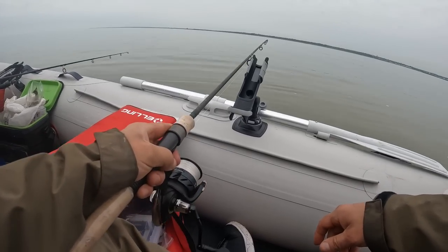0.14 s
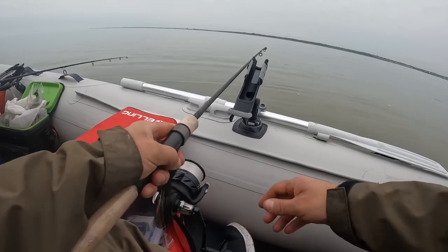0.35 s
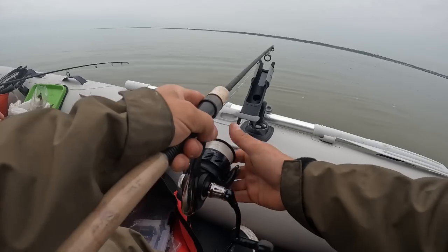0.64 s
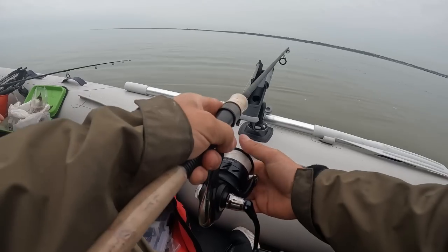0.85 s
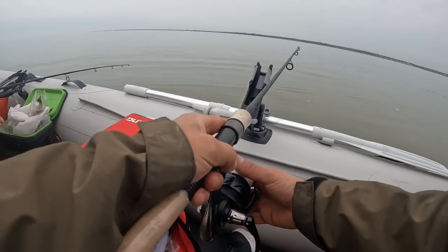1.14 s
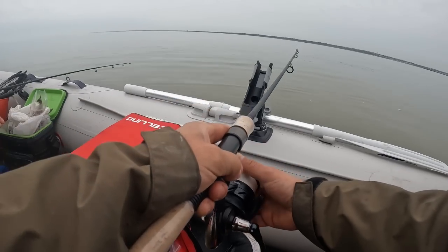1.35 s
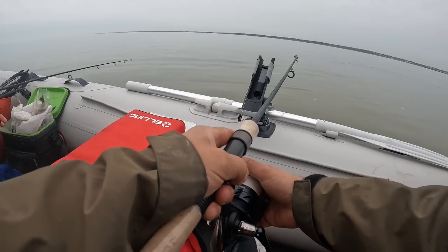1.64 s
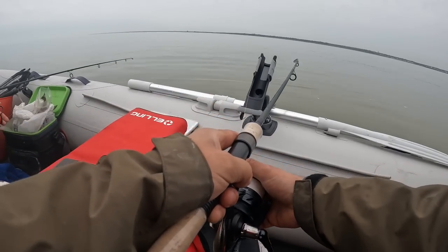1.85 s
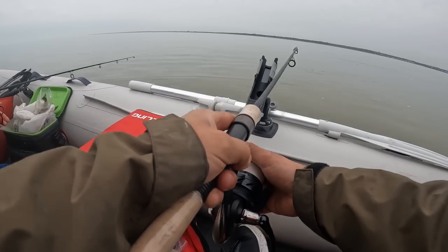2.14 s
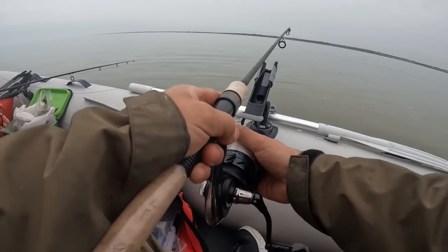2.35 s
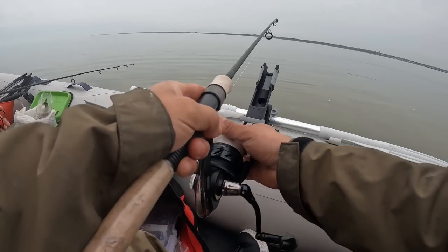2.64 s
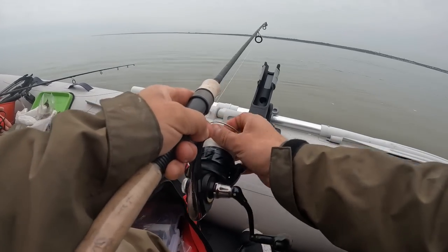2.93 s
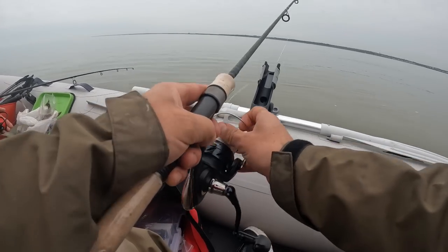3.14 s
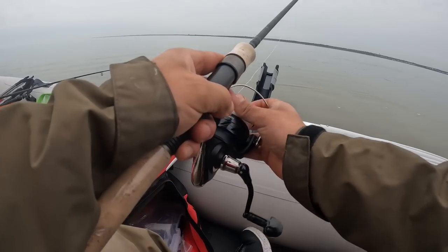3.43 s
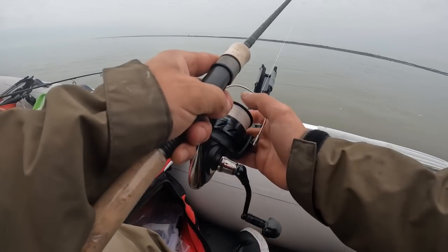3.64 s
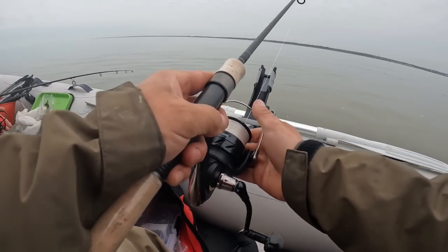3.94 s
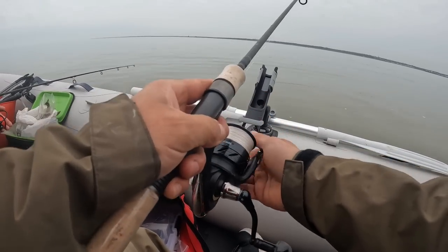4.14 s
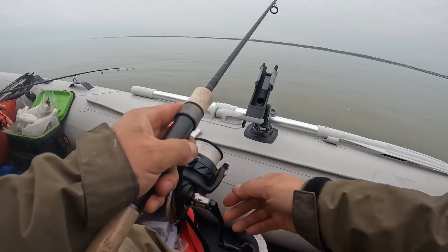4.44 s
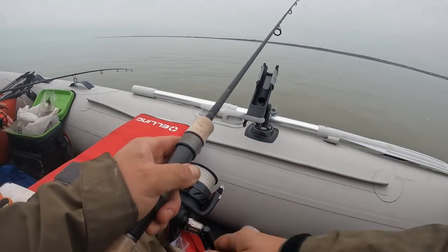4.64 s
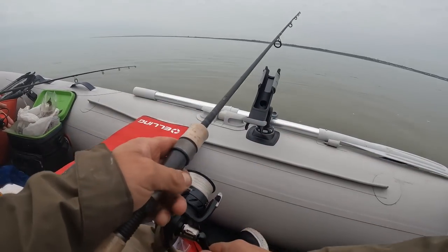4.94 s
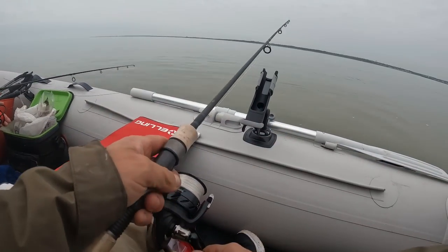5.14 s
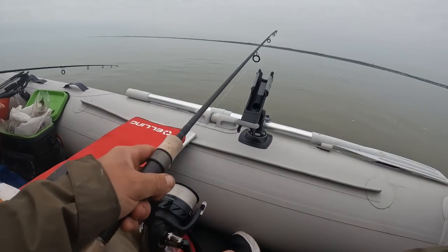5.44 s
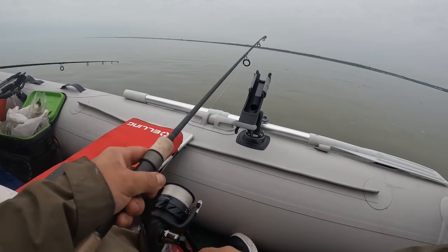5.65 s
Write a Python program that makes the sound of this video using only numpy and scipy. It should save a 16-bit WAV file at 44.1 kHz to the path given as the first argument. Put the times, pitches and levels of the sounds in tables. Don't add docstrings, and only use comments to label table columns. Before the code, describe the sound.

On an inflatable boat in open air, stiff sleeves swish as hands reach for a fishing rod. Sparse taps and small clacks follow, then a busy cluster of metallic reel ticks around three seconds. The bail snaps shut just after four seconds, then cloth rustles and a hollow tube thump sounds. Low swell and a faint engine hum continue underneath. The stereo microphone is close to the chest.

```python
import sys
import numpy as np
from scipy import signal
from scipy.fft import rfft, irfft, next_fast_len
from scipy.io import wavfile
from scipy.ndimage import uniform_filter1d, map_coordinates

SR = 44100
rng = np.random.default_rng(int(sys.argv[2]) if len(sys.argv) > 2 else 0)


def waveform_to_disk(signal):
    frames = np.transpose(np.atleast_2d(signal))
    scaled = np.clip(frames, -1, 1) * 32767
    samples = np.round(scaled).astype(np.int16)
    wavfile.write(sys.argv[1], SR, samples)


def nominal_scale(level):
    x = np.asarray(level, float) / 20
    return 10 ** x


N = 256017

# pitch in [Hz], level in [dB], share of the nudge's t60 [ratio].
TUBE_MODES = [(100.8, -4, 0.7), (142.4, 0.5, 0.55), (216.2, -6, 0.66), (269, -7.5, 0.54),
              (384, -15.5, 0.26)]


def unit(x):
    return x / np.sqrt(np.mean(x ** 2) + 1e-20)


def along(points, hz):
    f, v = np.transpose(points)
    return np.interp(np.log(hz + 1), np.log(f + 1), v)


def wobble(rate):
    knots = rng.standard_normal(int(N * rate / SR) + 4)
    return map_coordinates(knots, [np.arange(N) * rate / SR])


def filtered(x, response):
    m = next_fast_len(x.shape[-1] + 8192)
    spectrum = rfft(x, m) * response(np.fft.rfftfreq(m, 1 / SR))
    return irfft(spectrum, m)[..., :x.shape[-1]]


def resonances(modes):
    def response(f):
        total = 0
        for k, (centre, width, db) in enumerate(modes):
            loss = 1j * f * width
            total = total + (-1) ** k * nominal_scale(db) * loss / (centre * centre - f * f + loss)
        return total
    return response


def pair(shape):
    # frequency in [Hz], correlation [ratio].
    likeness = [(60, .995), (160, .99), (300, .92), (550, .8), (1200, .93), (2600, .74), (5000, .87),
                (8000, .96), (13000, .38)]
    hz, s, z = signal.stft(rng.standard_normal((2, N)), SR, nperseg=512)
    angle = np.arccos(np.clip(along(likeness, hz), -1, 1))[:, None] / 2
    z = z * shape(hz[:, None], s) * [np.cos(angle), np.sin(angle)]
    mid, side = signal.istft(z, SR, nperseg=512)[1][:, :N]
    return unit(np.array([mid + side, mid - side]))


def ring(modes, attack, scatter_db, detune=0):
    t = np.arange(SR // 3) / SR
    x = np.zeros(len(t))
    for hz, db, t60 in modes:
        strength_db = db + scatter_db * rng.standard_normal()
        pitch = hz * (1 + detune * rng.standard_normal())
        x += nominal_scale(strength_db - 60 * t / t60) * np.sin(2 * np.pi * pitch * t)
    x = x * (1 - np.exp(-t / attack))
    return x / np.abs(x).max()


def crack(t60, colour, blow=0):
    t = np.arange(SR // 12) / SR
    puff = rng.standard_normal(len(t)) * nominal_scale(-60 * t / t60)
    puff[:4] += blow
    x = filtered(puff, lambda hz: colour(hz) / (1 + 1j * hz / 9000))
    return x / np.abs(x).max()


def add(track, s, x, pan_db=0):
    track[:, round(s * SR):][:, :len(x)] += x * nominal_scale([[pan_db / 2], [-pan_db / 2]])


def strokes(rows, slopes, rest_db=-120):
    t = np.arange(0, N + 64, 64) / SR
    rows = np.array(rows)
    s, hold, level_db = rows[:, :1], np.abs(rows[:, 1:2]), rows[:, 2:]
    rise, fall = slopes
    fade_db = -rise * np.maximum(s - t, 0) - fall * np.maximum(t - s - hold, 0)
    power = nominal_scale(2 * level_db).T @ nominal_scale(2 * fade_db) + nominal_scale(2 * np.reshape(rest_db, (-1, 1)))
    return np.array([np.interp(np.arange(N) / SR, t, p) for p in power])


def rod():
    out = np.zeros((2, N + SR))
    knock_rod(out)
    tap_grip(out)
    ping_parts(out)
    return out[:, :N]


def knock_rod(out):
    # start in [s], ring in [dB], clack in [dB], butt thud in [dB], thud pitch in [Hz].
    knocks = [(1.5809, -46.5, -39, -50.5, 288), (1.6846, -37, -34, -42, 211),
              (1.7862, -52, -47.5, -41.5, 212), (1.9423, -33.5, -28, -35.5, 192),
              (2.3948, -27.5, -21.5, -33.5, 218), (2.43, -36, -35, -47, 217), (2.4512, -33, -24, -43, 205),
              (2.4572, -26, -18.5, -27.5, 239), (2.925, -26, -21.5, -36, 269),
              (3.066, -28.5, -23.5, -33, 213.5), (3.092, -34.5, -26.5, -32.5, 211),
              (3.1562, -34, -31, -35.5, 190.6)]
    # pitch in [Hz], level in [dB], t60 in [s].
    blank = [(410, -4, .11), (519, -6, .08), (925, -10, .1), (1135, 5, .06), (1250, -3, .045),
             (1370, -3, .04)]
    # pitch in [Hz], level in [dB], t60 in [s].
    spool = [(1560, -5, .024), (1920, 0, .024), (2300, -8, .014), (2890, 5, .02), (3090, 2, .016),
             (3400, 0, .02), (3800, -11, .014), (4100, -8, .02), (4390, -5, .024), (4750, -6, .016),
             (5600, -10, .014), (7300, -18, .01), (8500, -22, .01)]
    # multiple of the thud pitch [ratio], level in [dB], t60 in [s].
    butt = [(1.01, 15, 0.038), (1.4, -4, 0.13), (1.95, -3, 0.086), (2.5, -6.5, 0.027)]
    pan_db = 1
    loose_parts = resonances([(1430, 420, 0)] + [(hz, 400, level) for hz, level, _ in spool[1::2]])
    for s, ring_db, clack_db, thud_db, thud_hz in knocks:
        rattle = crack(0.04, loose_parts)
        add(out, s, nominal_scale(ring_db + 4) * ring(blank, attack=.0008, scatter_db=2), pan_db)
        clack = ring(spool, attack=.0003, scatter_db=2, detune=.01)
        add(out, s, nominal_scale(clack_db - .5) * clack, pan_db)
        add(out, s, nominal_scale(clack_db - 1.5) * rattle, pan_db)
        butt_modes = [(k * thud_hz, level, t60) for k, level, t60 in butt]
        thud = ring(butt_modes, attack=0.0013, scatter_db=1.5)
        add(out, s + 0.0029, nominal_scale(thud_db + 9.5) * thud)


def tap_grip(out):
    # start in [s], peak in [dB], top of the
    # spectrum in [Hz], t60 in [s].
    taps = [(0.002, -39, 1600, .03), (0.272, -37.5, 1300, 0.02), (1.235, -36, 3600, 0.016),
            (1.511, -50, 900, 0.02), (2.164, -44, 1860, 0.059), (3.645, -29, 2530, 0.021),
            (4.2, -39, 1000, 0.055), (4.2114, -33.5, 442, 0.13), (4.449, -30.5, 1490, 0.018),
            (4.894, -28.5, 1260, 0.18), (5.407, -38.5, 3000, 0.018), (5.4755, -29, 2600, 0.013)]
    for s, db, top_hz, t60 in taps:
        cork = resonances([(top_hz / 2, top_hz, 0)])
        add(out, s, nominal_scale(db - 2.5) * crack(t60, lambda hz: cork(hz) ** 2, blow=1.05))


def ping_parts(out):
    # start in [s], peak in [dB],
    # pitch in [Hz], t60 in [s].
    pings = [(1.237, -45, 554, 0.028), (1.512, -47, 700, 0.039), (1.553, -45.5, 1800, 0.055),
             (1.584, -46, 2180, 0.034), (1.686, -42, 2300, 0.038), (1.863, -50, 1140, 0.068),
             (1.866, -45, 1820, 0.053), (2.43, -37, 1970, 0.021), (1.685, -41, 5720, .02),
             (1.685, -46, 4670, .02), (3.194, -31.5, 5560, .025), (3.275, -38, 5650, .025),
             (4.183, -44, 3650, .05), (4.184, -50, 6500, .03), (4.205, -29, 186, 0.18),
             (2.483, -42, 1140, .06), (3.106, -29, 2100, .02), (3.113, -35, 1170, 0.037),
             (3.19, -19, 42.3, 0.05), (3.284, -40.5, 1146, 0.085), (3.298, -41, 1230, .03),
             (5.046, -33, 1340, 0.034), (5.05, -37, 1170, 0.016)]
    # start in [s], peak in [dB], pitch in [Hz], t60 in [s].
    shivers = [
        (4.2135, -41, 1143, .09),
        (4.238, -39, 1143, .08),
        (4.2485, -44, 1143, .09),
        (4.2625, -51, 1143, .08),
    ]
    for s, db, hz, t60 in pings + shivers:
        note = ring([(hz, 0, t60), (1.08 * hz, -5, t60 / 2)], attack=.0015, scatter_db=0)
        add(out, s, nominal_scale(db) * note)


def reel():
    # start in [s], peak in [dB], pitch in [Hz], pan in [dB].
    ticks = [(1.557, -43, 3100, -4), (1.627, -47, 7500, 2), (1.867, -46, 3000, -4), (1.785, -46, 2240, 0),
             (1.7855, -41.5, 4400, 0), (1.936, -49, 5760, -1), (1.9415, -41, 6900, 3),
             (1.9445, -32.5, 2900, -2), (1.9645, -46, 3900, 0), (1.965, -43, 1900, 2),
             (1.9855, -50, 2200, -2), (1.986, -52, 3900, 0), (2.1926, -38, 5240, -6),
             (2.3995, -31, 2900, 3), (2.4835, -36.5, 4800, 2), (2.487, -34, 7300, 4),
             (2.4515, -33, 4600, 2), (2.4585, -29, 2900, 2), (3.081, -29, 6350, -3),
             (3.0818, -21.5, 3300, -1), (3.1067, -27, 4000, 1), (3.1295, -29, 2160, -5),
             (3.13, -42, 3900, -3), (3.183, -31, 1300, -6), (3.1936, -38, 5600, -1), (3.194, -25, 3200, 0),
             (3.2176, -27, 4800, -3), (3.218, -37, 2300, -3), (3.238, -31, 7200, 2), (3.2382, -37, 2780, 0),
             (3.251, -28, 2200, -4), (3.2515, -27, 3620, -4), (3.2513, -35, 5500, 0),
             (3.274, -37, 5600, -4), (3.2748, -31, 2100, -6), (3.286, -32, 2880, -1),
             (3.323, -29, 2270, -2.5), (3.3564, -35, 5600, 4), (3.406, -37.5, 5900, -3),
             (3.455, -43, 2000, 0), (3.5399, -42, 2150, 10), (3.558, -42, 4200, 0), (3.771, -52, 12000, 16),
             (3.967, -52, 10500, 21), (4.029, -50, 11000, 17), (4.0795, -48, 8900, 22),
             (4.289, -57, 5530, -1), (4.4251, -45, 4040, -21), (4.8698, -30.5, 4730, 3),
             (5.5386, -27.5, 3850, 2)]
    # start in [s], peak in [dB], pitch in [Hz], pan in [dB].
    snap = [(4.1983, -17, 3900, -6), (4.1988, -21, 5500, -4), (4.1995, -20, 2300, -6),
            (4.2025, -23, 3900, -4), (4.203, -25, 5500, -2), (4.2058, -18.5, 6900, 2),
            (4.2062, -17.5, 3900, 0), (4.207, -27, 2300, 0), (4.2114, -24, 2300, -3),
            (4.2118, -21.5, 3900, -2), (4.2122, -26, 6700, 1)]
    # pitch in [Hz], width in [Hz], level in [dB].
    bail_body = [(1300, 540, 2), (2300, 400, 5), (3850, 1400, 1), (5880, 340, 8), (7010, 1200, 1.5),
                 (10100, 1900, -1.5)]
    # pitch in [Hz], width in [Hz], level in [dB].
    snap_body = [(1400, 270, 2.5), (2300, 360, 2), (3100, 620, -4.5), (3900, 490, -2), (5500, 850, -2),
                 (6900, 700, 1.5), (10500, 2200, -5.5)]
    out = np.zeros((2, N + SR))
    for rows, modes, t60, lead_db in [(ticks, bail_body, .012, 13), (snap, snap_body, .014, 12)]:
        body = resonances(modes)
        for s, db, lead_hz, pan_db in rows:
            lead = resonances([(lead_hz, 600, lead_db)])
            contact = crack(t60, lambda hz: body(hz) * (1.5 + lead(hz)), blow=1.84)
            add(out, s, nominal_scale(db + 3.5) * contact, pan_db)
    add(out, 4.268, nominal_scale(-66) * ring([(10300, 0, .12)], attack=.05, scatter_db=0))
    return out[:, :N]


def near_walls(x, count=8):
    echoes = np.zeros((2, SR // 40))
    echoes[:, 0] = 1
    for side in echoes:
        side[rng.integers(12, 500, count)] = rng.normal(0, 0.051, count)
    return signal.fftconvolve(x, echoes, axes=1)[:, :N]


def line():
    # start in [s], hold in [s], level in [dB].
    slips = [
        (3.76, .03, -76),
        (3.95, .1, -71),
        (4.08, 0.11, -65.5),
    ]
    slipping = np.sqrt(strokes(slips, (58, 160)))
    guides = resonances([(11200, 4900, 0)])
    whisper = pair(lambda hz, s: np.abs(guides(hz)) ** 2) * nominal_scale(1.7 * wobble(200))
    return slipping * unit(whisper) * nominal_scale([[1.5], [-1.5]])


def sleeves():
    # start in [s], hold in [s], hiss in [dB], scrape in [dB], rub in [dB].
    arm = [(-0.007, 0.29, -61.5, -67, -67.5), (0.27, 0.1, -68, -62, -59), (0.365, 0.013, -50, -55.5, -53),
           (0.55, 0.069, -39.5, -43, -45.5), (0.648, 0.085, -51.5, -49, -46.5),
           (0.772, 0.043, -40, -47, -49), (2.28, 0.072, -54.5, -61, -69), (2.995, 0.047, -51, -58, -59),
           (3.736, 0.03, -60, -64, -85.0), (3.882, 0.31, -61, -65.5, -59),
           (4.203, 0.054, -57.5, -59.5, -54), (4.429, 0.09, -53.5, -58, -52.5),
           (4.572, 0.14, -44.5, -43.5, -49), (4.728, 0.12, -44.5, -43.5, -52), (4.924, 0.11, -47, -49, -47),
           (5.011, 0.079, -45, -44, -71), (5.144, 0.11, -49.5, -48.5, -52), (5.331, 0.039, -53, -59.5, -59),
           (5.467, 0.092, -47, -52, -64), (5.56, 0.15, -51.5, -56.5, -55), (5.741, 0.071, -46, -51.5, -50)]
    # start in [s], hold in [s], hiss in [dB], scrape in [dB], rub in [dB].
    wrist = [(0.412, 0.14, -37.5, -37.5, -45.5), (0.886, 0.034, -53.5, -56, -53),
             (0.988, 0.081, -50, -58.5, -58.5), (1.165, 0.045, -52, -62, -59.5),
             (1.249, 0.075, -62, -62, -63), (1.376, 0.014, -56.5, -62.5, -69),
             (1.45, 0.01, -55, -64.5, -84.5), (1.539, 0.035, -55, -60, -55),
             (1.634, 0.036, -57.5, -62, -66), (1.711, 0.026, -62.5, -64, -57),
             (1.778, 0.011, -60.5, -57, -77), (1.834, 0.04, -58, -59.5, -58),
             (1.965, 0.00041, -57.5, -55.5, -59), (2.094, 0.034, -59, -65.0, -70),
             (2.186, 0.049, -62, -68, -72), (2.422, 0.067, -50, -49.5, -45.5),
             (2.515, 0.046, -52, -58, -53.5), (2.636, 0.073, -54.5, -63.5, -85.0),
             (2.706, 0.022, -57.5, -58.5, -66), (2.761, 0.12, -62.5, -63, -66.5),
             (2.833, 0.092, -61.5, -77, -86), (2.927, 0.026, -72, -56.5, -55)]
    # start in [s], hold in [s], hiss in [dB], scrape in [dB], rub in [dB].
    cuff = [(3.07, 0.064, -44, -47.5, -47.5), (3.169, 0.058, -43, -49.5, -47),
            (3.251, 0.053, -44, -52.5, -53.5), (3.329, 0.045, -49, -55.5, -54),
            (3.402, 0.052, -48.5, -56, -54.5), (3.475, 0.042, -47, -54.5, -74),
            (3.545, 0.035, -50, -53, -67), (3.618, 0.015, -58, -56, -63), (3.671, 0.029, -63, -62.5, -61),
            (4.184, 0.011, -52, -74, -66), (4.289, 0.028, -64, -72, -78)]
    power = strokes(arm, (158, 220), rest_db=(-71, -97, -87))
    power = power + strokes(wrist, (440, 360)) + strokes(cuff, (1500, 730))
    hissing, scraping, rubbing = np.sqrt(power)
    scrape, hiss, rub = cloth_scrape(), cloth_hiss(), cloth_rub()
    return nominal_scale(3.0) * scraping * scrape + nominal_scale(1.02) * hissing * hiss + nominal_scale(-3.5) * rubbing * rub


def cloth_scrape():
    # time in [s], pitch in [Hz], upper mode in [dB].
    fold_path = [(0, 1490, 0.5), (.4, 1200, -25), (.6, 1250, -18), (.75, 1230, -3.5), (2.5, 1330, -5.5),
                 (3.15, 1270, -4), (3.3, 1230, -4.5), (4.4, 1190, -2), (4.58, 1540, -7), (4.85, 1550, -7.5),
                 (5.0, 1400, -4.5), (5.2, 1400, -2), (5.4, 1200, -7.5), (5.8, 1180, -3.5)]
    times, pitch_hz, upper_db = np.transpose(fold_path)

    def fold(hz, s):
        low_hz = np.interp(s, times, pitch_hz)
        modes = [(low_hz, 580, 0), (1.62 * low_hz, 1100, np.interp(s, times, upper_db))]
        edge = 1 + (hz / np.minimum(1.94 * low_hz, 2750)) ** 22
        low_cut = hz ** 8 / (hz ** 8 + 930. ** 8)
        return np.abs(resonances(modes)(hz)) / edge * low_cut

    return unit(pair(fold) * nominal_scale(1.3 * wobble(150)))


def cloth_hiss():
    # frequency in [Hz], density in [dB per Hz].
    fibres = [(1410, -15), (2400, -1.5), (2780, -1), (4150, 0.5), (5680, -1.5), (6140, -2), (7120, -0.5),
              (8200, -8), (12000, -13), (14100, -23.5), (15600, -29)]
    uneven = patches(depth_db=1.4)
    hiss = pair(lambda hz, s: nominal_scale(along(fibres, hz)) * uneven(hz, s))
    return unit(hiss * nominal_scale(0.91 * wobble(400) + 1.41 * wobble(60)))


def patches(depth_db):
    def field(hz, s):
        raw = rng.standard_normal((len(hz), len(s)))
        smooth = uniform_filter1d(uniform_filter1d(raw, size=5, axis=0), size=10, axis=1)
        return nominal_scale(depth_db * unit(smooth))
    return field


def cloth_rub():
    dull = resonances([(480, 450, 0)])
    return unit(pair(lambda hz, s: np.abs(dull(hz)) ** 2) * nominal_scale(2.3 * wobble(80)))


def hull():
    # start in [s], hold in [s], swell in [dB], tube creak in [dB], engine in [dB].
    lurches = [(0.065, 0.26, -41.5, -60, -44.5), (0.299, 0.16, -36, -49.5, -56),
               (0.559, 0.14, -36.5, -51, -46), (0.78, 0.14, -38, -45, -40), (1.08, 0.48, -41.5, -60, -44.5),
               (1.41, 0.2, -60, -57.5, -50), (1.721, 0.0072, -36.5, -53, -67),
               (1.912, 0.069, -41, -82, -45), (2.094, 0.032, -41, -80, -53), (2.24, 0.078, -43, -59, -48.5),
               (2.436, 0.03, -30.5, -42, -34), (2.56, 0.26, -41.5, -68, -55),
               (2.897, 0.092, -57, -51, -44.5), (3.097, 0, -31, -60, -44), (3.156, 0.033, -26, -43.5, -51),
               (3.306, 0.063, -34, -45.5, -41.5), (3.494, 0.091, -38, -51.5, -43),
               (3.71, 0.23, -47.5, -81, -42), (4.029, 0.26, -42, -55, -43), (4.44, 0.23, -44, -54, -48),
               (4.815, 0.22, -39, -47, -63), (5.212, 0.15, -45.5, -58.5, -43.5),
               (5.43, 0.24, -40.5, -61, -46.5), (5.712, 0.14, -45, -53, -45)]
    swelling, creaking, droning = np.sqrt(strokes(lurches, (168, 150), rest_db=(-50, -90, -52.5)))
    moving = swelling * swell() + nominal_scale(2.1) * creaking * tube_creak()
    return moving + droning * far_engine() + tube_booms()


def swell():
    # frequency in [Hz], density in [dB per Hz].
    rumble = [(12, -24), (20, 4.5), (40, -8.5), (55, -4), (75, -13.5), (100, -8), (200, -120)]
    common, apart = rng.standard_normal((2, N))
    return unit(filtered(common + apart * [[.13], [-.13]], lambda hz: nominal_scale(along(rumble, hz))))


def tube_creak():
    friction = rng.standard_normal(N) * nominal_scale(2.5 * wobble(23))
    return unit(filtered(friction, resonances([(hz, 35, db) for hz, db, _ in TUBE_MODES])))


def far_engine():
    note = np.sin(2 * np.pi * np.cumsum(59.5 + 1.76 * wobble(8.7)) / SR)
    band = resonances([(58, 16, 0)])
    rough = unit(filtered(rng.standard_normal(N), lambda hz: band(hz) ** 2))
    return unit(note + 0.52 * rough)


def tube_booms():
    # start in [s], peak in [dB], t60 in [s], tilt in [dB per octave].
    nudges = [
        (0.275, -19, 0.32, -2.5),
        (0.8, -27.5, 0.45, -7.5),
        (1.249, -33.5, 0.88, -6.5),
        (2.257, -31, 0.22, -7.5),
        (3.377, -29.5, 0.17, -8.5),
        (3.421, -25.5, 0.15, -17),
        (4.062, -27, 0.1, -6),
        (4.181, -36, 0.72, -1),
        (4.893, -11, 0.27, 0.5),
        (4.961, -21.5, 0.18, -4),
    ]
    booms = np.zeros((2, N + SR))
    for s, db, t60, tilt_db in nudges:
        modes = [(hz, level + tilt_db * np.log2(hz / 150), share * t60) for hz, level, share in TUBE_MODES]
        add(booms, s, nominal_scale(db - 0.1) * ring(modes, attack=0.012, scatter_db=1.5))
    return booms[:, :N]


def open_air():
    # frequency in [Hz], density in [dB per Hz].
    air_colour = [(53, -22), (90, -1), (145, -6.5), (282, -8), (407, -23.5), (527, -21.5), (761, -37),
                  (1360, -20.5), (2720, -59), (4360, -36), (7010, -58), (8510, -45), (12000, -43),
                  (15600, -51)]
    return nominal_scale(-56.5) * pair(lambda hz, s: nominal_scale(along(air_colour, hz)))


def scene():
    return near_walls(rod() + reel()) + line() + sleeves() + hull() + open_air()


def band_limit(x):
    return signal.sosfilt(signal.butter(12, 15720, fs=SR, output="sos"), x)


def record(dry):
    # frequency in [Hz], gain in [dB].
    top_end = [(100, 0), (14000, 0), (15300, -5), (15700, -11), (15800, -60)]
    # frequency in [Hz], left minus right in [dB].
    lean = [(100, .4), (500, .3), (1000, .4), (2200, -.8), (4000, .3), (8000, 1.2), (13000, 3.2)]
    # frequency in [Hz], phase by which left leads in [radians].
    lead = [(60, 0), (200, -.06), (600, -.6), (1200, -.28), (2000, -.92), (2600, -.92), (4600, -.35),
            (9000, .1)]
    side = np.array([[.5], [-.5]])

    def ports(hz):
        gain = nominal_scale(along(top_end, hz) + side * along(lean, hz))
        return gain * np.exp(1j * side * along(lead, hz))

    return band_limit(filtered(dry, ports))


dry = scene()
out = record(dry)
waveform_to_disk(out)
```